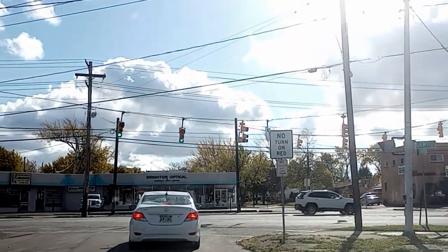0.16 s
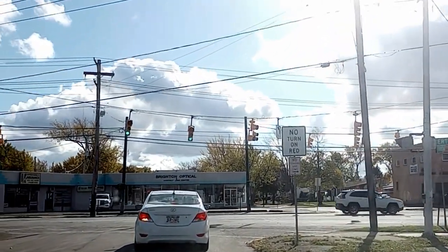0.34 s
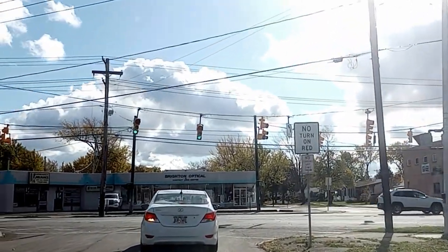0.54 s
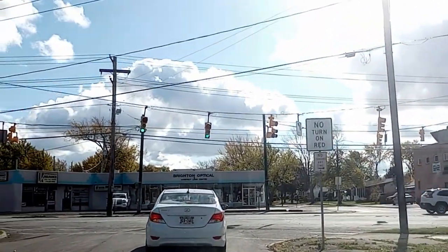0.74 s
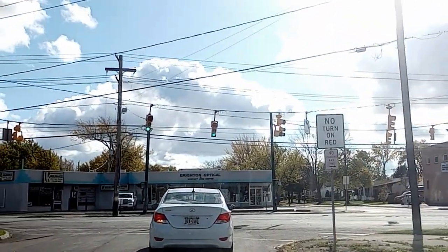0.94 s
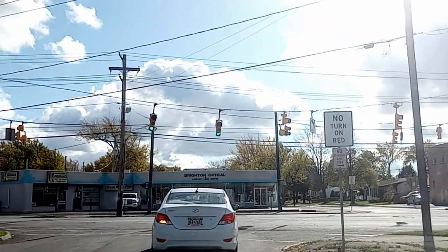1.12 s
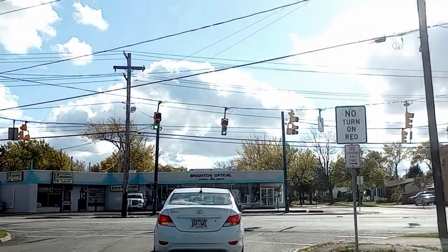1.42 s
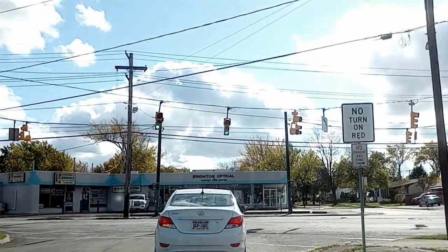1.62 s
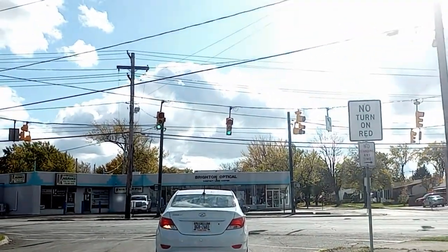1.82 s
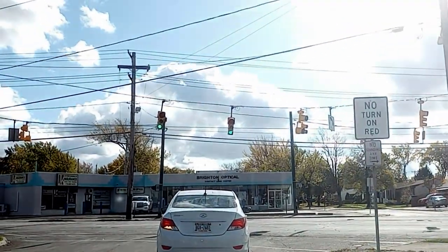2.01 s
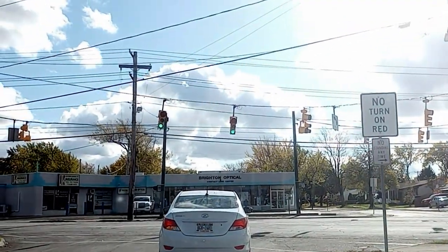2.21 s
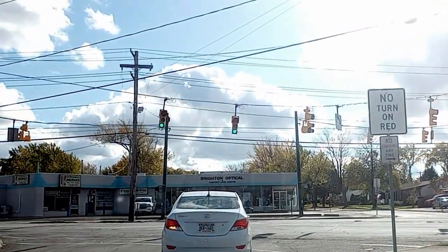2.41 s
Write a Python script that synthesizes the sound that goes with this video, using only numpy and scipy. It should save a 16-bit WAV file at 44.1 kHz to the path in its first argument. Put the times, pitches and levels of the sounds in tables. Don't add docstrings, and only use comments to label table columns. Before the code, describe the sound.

A low, uneven engine rumble fills a truck cab rolling to a junction, with faint vent air; cloth rustles close to the phone, then a sharp latch clack and a dull bump follow late.

```python
import sys
import numpy as np
from scipy import signal
from scipy.fft import rfft, irfft
from scipy.io import wavfile
from scipy.ndimage import uniform_filter1d

SR = 44100
rng = np.random.default_rng(int(sys.argv[2]) if len(sys.argv) > 2 else 0)


def boost(x):
    u = np.asarray(x, float) / 20
    return 10 ** u


def unload_wav(signal):
    wavfile.write(
        sys.argv[1],
        SR,
        np.round(np.clip(np.atleast_2d(signal).T, -1, 1) * 32767).astype(np.int16),
    )


N = 112454
T = np.arange(N) / SR
CLOTH_ALIKE = 0.11


def colour(x, table, size=8192):
    hz, db = np.array(table, float).T
    grid_hz = np.arange(size // 2 + 1) * SR / size
    log_gain = np.interp(np.log(grid_hz + 1), np.log(hz), db) * np.log(10) / 20
    cepstrum = irfft(log_gain)
    cepstrum[1:size // 2] *= 2
    cepstrum[size // 2 + 1:] = 0
    response = irfft(np.exp(rfft(cepstrum)))[None, :size // 2]
    return signal.fftconvolve(x, response, axes=1)[:, :x.shape[1]]


def level(x, db):
    return x * boost(db) / np.sqrt(np.mean(x ** 2))


def curve(table):
    return np.interp(T, *np.array(table, float).T)


def pan(db):
    return boost(np.array([db / 2, -db / 2]).reshape(2, -1))


def noise(alike, size=N):
    mid, side = rng.standard_normal((2, size))
    alike = np.clip(alike, -1, 1)
    shared = np.sqrt((1 + alike) / 2) * mid
    return shared + np.sqrt((1 - alike) / 2) * side * np.array([[1], [-1]])


def walk(rate):
    hold = int(SR / rate)
    steps = np.repeat(rng.standard_normal(N // hold + 1), hold)
    return 1.51 * uniform_filter1d(uniform_filter1d(steps, hold), hold)[:N]


def add(out, at_s, x):
    i = int(at_s * SR)
    out[:, i:i + x.shape[1]] += x[:, :N - i]


def hump(hz, octaves, ripple):
    steps = np.linspace(-4, 4, len(ripple))
    return np.c_[hz * 2 ** (octaves * steps), ripple - 6 * np.abs(steps) ** 1.6]


def rumble():
    # t/s, level/dB
    load = [(0.0, -31), (0.07, -37), (1.12, -36), (1.39, -38.5), (1.94, -35.5), (2.12, -39), (2.55, -36.5)]
    # f/Hz, gain/dB
    cab = [(25, -26), (60, -5.5), (94, 1), (135, -5), (182, -5), (235, -10.5), (265, -26.5), (330, -53.5)]
    firing_hz, jitter, scatter_db = 31.1, 0.06, 4.0
    timing, strength = rng.standard_normal((200, 2)).T
    at = np.cumsum((1 + jitter * timing) / firing_hz) * SR
    inside = at < N
    firings = np.zeros((2, N))
    firings[:, at[inside].astype(int)] = boost(scatter_db * strength[inside])
    road = boost(-3.5 + 2.0 * walk(14)) * noise(alike=0.8)
    drive = level(firings, -8.5) + road
    return level(colour(drive, cab), 0) * boost(curve(load)) * pan(-0.15)


def vent():
    # f/Hz, gain/dB
    air_band = [(100, -40), (240, -5.5), (310, -13), (350, -8), (500, -9), (590, -28), (680, -16),
                (800, -30)]
    # f/Hz, gain/dB
    duct_band = [(700, -24), (790, -14), (830, -1), (950, 0), (1100, -6), (1900, -9), (2300, -18),
                 (4000, -30)]
    alike = 0.017
    air = level(colour(noise(alike), air_band), -62) * boost(0.84 * walk(8.93))
    duct = level(colour(noise(-0.15), duct_band), -60) * boost(1.0 * walk(9))
    hiss = colour(noise(alike), [(600, -36), (2500, -5)]) * boost(-68.5 + 1.5 * walk(15))
    return air + duct + hiss


def cloth():
    # t/s, level/dB
    sliding = [(0, -73.5), (.12, -65.5), (.3, -73), (.44, -67.5), (.48, -61), (.7, -59), (.78, -67.5),
               (.94, -68.5), (.98, -61.5), (1.34, -52), (1.43, -63.5), (1.72, -71), (1.76, -59.5),
               (1.95, -58), (2.17, -58), (2.25, -63), (2.3, -52.5), (2.45, -72.5), (2.55, -56)]
    # t/s, left minus right/dB
    place = [(0, -0.5), (.8, -1), (1.2, -3.5), (1.95, -2.5), (2.08, -9.5), (2.22, -5), (2.28, -4),
             (2.55, 2)]
    grains_per_s, grain_db = 1900, 1.4
    grains = (rng.random(N) < grains_per_s / SR) * boost(grain_db * rng.exponential(size=N))
    grains = uniform_filter1d(grains, size=8)
    rub = (1 + level(grains, -8.5)) * noise(CLOTH_ALIKE) * boost(1.2 * walk(40))
    rub = colour(rub, [(600, -24), (2500, -17), (5500, 6), (12000, -8), (15000, -9.5)])
    return level(rub, 0) * boost(curve(sliding) + 5.5) * pan(curve(place))


def thuds():
    # t/s, peak level/dB, f/Hz, length/s, left minus right/dB
    bumps = [(0.141, -31, 83.3, 0.067, -1.5), (.375, -35, 103, .04, -8), (.51, -27.5, 99.7, 0.038, -1),
             (0.759, -30, 96.2, 0.061, -1), (1.64, -27, 141, 0.026, 6.5), (1.655, -25, 83.4, 0.055, -3.5),
             (1.9498, -16.5, 182, 0.035, -4), (1.9862, -15.5, 142, 0.012, -3.5),
             (2.008, -31.5, 122, 0.018, -8), (1.969, -25, 135, .015, -4), (1.952, -29, 260, .028, -8),
             (1.949, -33, 360, .024, -4), (1.949, -37, 470, .022, -4), (2.107, -32, 90.7, .05, -2.5)]
    out = np.zeros((2, N))
    for at, db, hz, length, pan_db in bumps:
        t = T[:int(length * SR)]
        shape = np.sin(np.pi * (t / length) ** 0.72) ** 0.58
        add(out, at, boost(db) * shape * np.sin(2 * np.pi * hz * t) * pan(pan_db))
    return out


def strikes(table, octaves, tail_db):
    rise_s, alike, ripple_db, lag_s_per_db = 0.0011, 0.61, 2.0, 0.00007
    out, t = np.zeros((2, N)), T[:6000]
    for at, db, hz, t60, pan_db in table:
        click = t == t[1]
        rattle = noise(alike, size=len(t)) * (1 - np.exp(-t / rise_s)) * boost(-60 * t / t60)
        body = hump(hz, octaves, ripple_db * rng.standard_normal(size=33))
        rung = colour(np.vstack([click, rattle]), body, size=2048)
        hit, tail = rung[:1], rung[1:]
        burst = hit / np.abs(hit).max() + boost(tail_db) * tail / np.abs(tail).max()
        burst = burst / np.abs(burst).max() * boost(db) * pan(pan_db)
        add(out[:1], at - min(pan_db, 0) * lag_s_per_db, burst[:1])
        add(out[1:], at, burst[1:])
    return out


def ticks():
    # t/s, peak level/dB, centre f/Hz, time to fade by 60 dB/s, left minus right/dB
    cracks = [(0.205, -42, 7000, .05, -9), (.205, -45, 3600, .035, -5), (1.546, -38, 14000, .05, -16.5),
              (1.576, -40, 6500, .05, -7), (1.6225, -31, 5600, .075, -16), (1.624, -25, 3000, .09, -10),
              (1.626, -21, 9000, .055, -8), (1.623, -26, 1200, .085, -3), (1.641, -30, 1700, .08, -2),
              (1.633, -26, 4400, .07, -3), (1.622, -32, 12000, .11, -17), (1.669, -24, 2600, .065, -3),
              (1.6695, -29, 6800, .055, -3), (1.742, -41, 4060, .06, -4), (1.948, -42, 1500, .07, -7.5),
              (2.269, -36, 6000, .17, 0), (2.269, -36, 14000, .04, -1), (1.947, -44, 2800, .07, -2)]
    return strikes(cracks, octaves=0.48, tail_db=0.0)


def snaps():
    # t/s, peak level/dB, f/Hz, time to fade by 60 dB/s, left minus right/dB
    tones = [(.2056, -30.5, 1000, .014, -5), (.2052, -37, 1690, .016, -5), (.2055, -46, 6500, .015, -8),
             (.2065, -46, 5300, .01, -8), (.214, -43, 953, .05, -5), (.2478, -35, 1000, .01, -3),
             (.2478, -39, 1700, .012, -3), (1.5755, -37, 6100, .025, -7), (1.6235, -25, 6400, .02, -12),
             (1.6277, -9.5, 5800, .0045, -8), (1.6297, -17, 5200, .007, -8), (1.6297, -21, 6400, .007, -8),
             (1.6325, -25, 5170, .012, -6), (1.637, -27, 5350, .018, -4), (1.637, -31, 6920, .012, -4),
             (1.642, -30, 5700, .014, -4), (1.646, -33, 4985, .015, -3), (1.626, -27, 1335, .05, -5),
             (1.634, -28, 1020, .045, -4), (1.625, -29, 2210, .045, -5), (1.634, -26, 1660, .045, -3.5),
             (1.634, -28, 1880, .045, -3.5), (1.634, -29, 1480, .12, -3), (1.636, -31, 1238, .055, -3),
             (1.626, -33, 3220, .04, -8), (1.63, -29, 3910, .04, -8), (1.626, -26, 4720, .03, -8),
             (1.67, -33, 2370, .02, -4), (1.948, -38, 890, .06, -5), (1.949, -44, 1270, .05, -5),
             (1.948, -43, 1770, .045, -5), (2.049, -35, 4194, .035, -8), (2.269, -36, 4800, .015, 0),
             (2.272, -42, 2100, .012, 0), (2.279, -42, 1950, .012, 0), (2.31, -46, 1900, .012, 0),
             (2.418, -32, 3919, .03, -4), (2.418, -38, 3688, .04, -4), (2.418, -38, 4210, .035, -4),
             (2.42, -41, 3128, .06, -4)]
    quarter_turn, scatter = 0.25, 0.06
    out, t = np.zeros((2, N)), T[:8000]
    for at, db, hz, t60, pan_db in tones:
        rise_s = min(0.08 * t60, 0.0012)
        shape = (1 - np.exp(-t / rise_s)) * boost(-60 * t / t60)
        turn = np.array([[-quarter_turn], [0]]) + scatter * rng.standard_normal((2, 1))
        tone = np.sin(2 * np.pi * (hz * t + turn))
        add(out, at, boost(db) * shape / shape.max() * tone * pan(pan_db))
    return out


def pings():
    # t/s, peak level/dB, centre f/Hz, time to fade by 60 dB/s, left minus right/dB
    parts = [(.206, -38, 1150, .07, -5), (.206, -40, 1750, .08, -5), (.206, -48, 500, .08, -3),
             (.254, -44, 950, .07, -3), (.255, -42, 1750, .12, -3), (.838, -42, 3300, .04, -2),
             (1.547, -28, 6000, .055, -10), (1.578, -46, 2250, .05, 0), (1.675, -38, 1300, .08, -3),
             (2.049, -30, 4500, .07, -8), (2.053, -33, 2800, .09, -6), (2.27, -48, 2400, .05, 0),
             (2.269, -40, 4800, .06, 0), (2.295, -52, 1800, .06, 0), (2.419, -46, 6900, .06, -4),
             (2.426, -35, 3500, .07, -4), (2.42, -48, 1800, .08, -4)]
    return strikes(parts, octaves=0.17, tail_db=-2.0)


def strokes():
    # t/s, length/s, level/dB, centre f/Hz, left minus right/dB
    rubs = [
        (.4, .34, -66, 1750, -1),
        (1.02, .25, -70, 5600, -5),
        (1.26, .16, -66, 15200, -10),
        (2.04, .2, -57, 5600, -13),
        (.46, .26, -67, 5200, -2),
    ]
    out = np.zeros((2, N))
    for at, length, db, hz, pan_db in rubs:
        band = hump(hz, 0.1, rng.standard_normal(size=9))
        rub = level(colour(noise(CLOTH_ALIKE), band, size=2048), db) * boost(2.0 * walk(30))
        progress = np.clip((T - at) / length, 0, 1)
        swell = np.sqrt(np.sin(np.pi * progress) + 1e-9)
        out = out + rub * swell * pan(pan_db)
    return out


def panel():
    # f/Hz, level/dB, time to fade by 60 dB/s
    modes = [(477.4, -2, .16), (280, -2.5, .1), (888, -4, 0.098), (1360, -6, 0.063), (1510, -6, .09),
             (1644, -5, 0.071), (1870, -5, 0.045)]
    # t/s, level/dB, contact/s
    blows = [
        (1.629, -30, 0.00077),
        (1.669, -50, .0005),
        (1.948, -38, 0.0016),
    ]
    out, t = np.zeros((2, N)), T[:16384]
    for at, db, contact in blows:
        for hz, mode_db, t60 in modes:
            strength = boost(db + mode_db + 2.0 * rng.standard_normal((2, 1)))
            strength = strength / (1 + (hz * contact) ** 2)
            fade = boost(-60 * t / t60) * np.minimum(t / 0.0022, 1)
            add(out, at, strength * np.sin(2 * np.pi * hz * t) * fade)
    return out


def scene():
    steady = rumble() + vent() + cloth()
    return steady + thuds() + ticks() + snaps() + pings() + strokes() + panel()


def low_pass(x):
    return signal.sosfilt(signal.butter(12, 17110, fs=SR, output="sos"), x)


def record(dry):
    # f/Hz, gain/dB
    openings = [(2000, 1.5), (3200, -3.5), (4500, -0.5), (5700, 6.5), (7000, -1.5), (8200, -9), (13800, -2),
                (14800, -6.5)]
    ring_hz, ring_width_hz, ring_db, top_hz = 15210, 390, 31.5, 15460
    x = colour(dry, openings + [(16500, -4)])
    b, a = signal.iirpeak(ring_hz, ring_hz / ring_width_hz, SR)
    ring = signal.lfilter(b, a, signal.lfilter(b, a, x))
    x = x + boost(ring_db) * ring
    steep_top = signal.ellip(8, 0.5, 50, top_hz, fs=SR, output="sos")
    mix = signal.sosfilt(steep_top, x)
    return low_pass(mix)


dry = scene()
out = record(dry)
unload_wav(out)
```